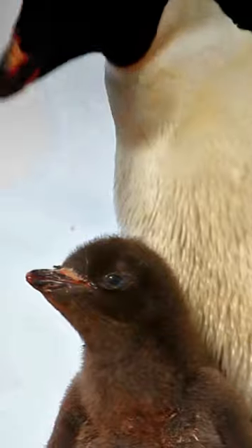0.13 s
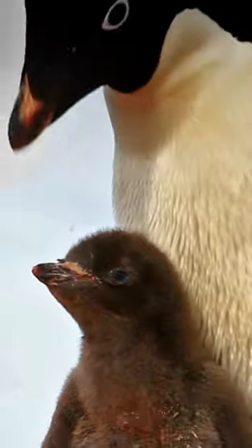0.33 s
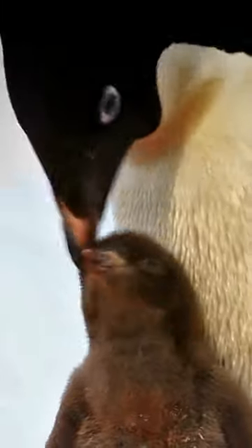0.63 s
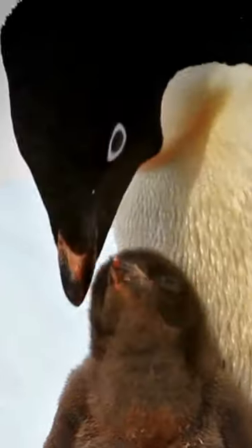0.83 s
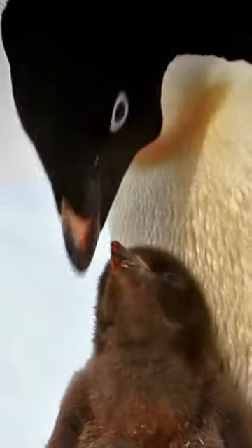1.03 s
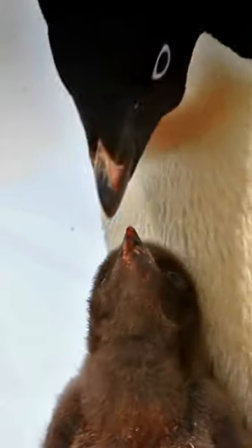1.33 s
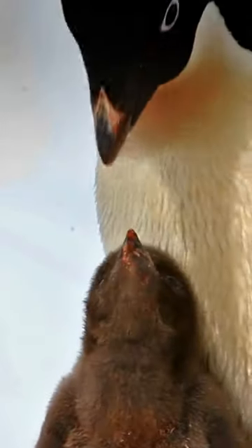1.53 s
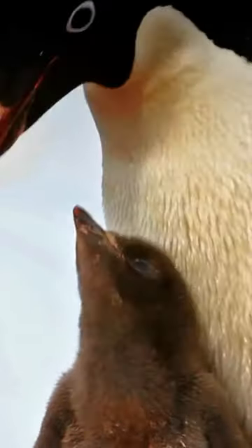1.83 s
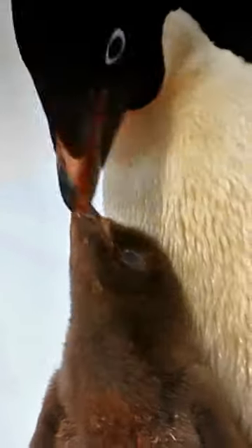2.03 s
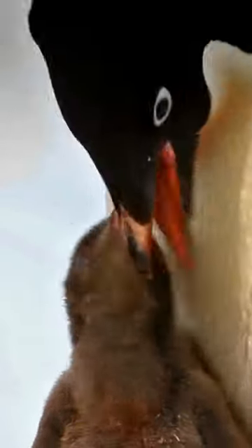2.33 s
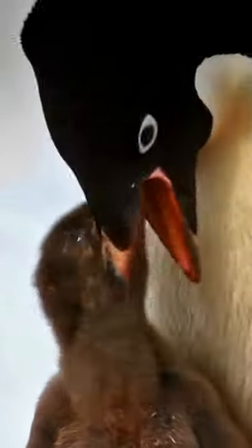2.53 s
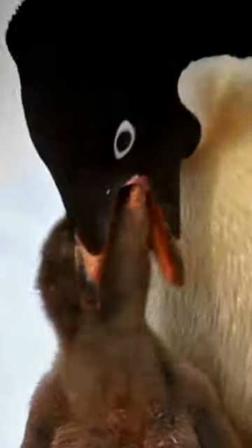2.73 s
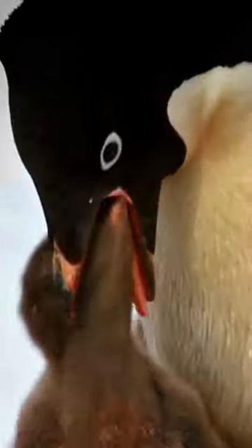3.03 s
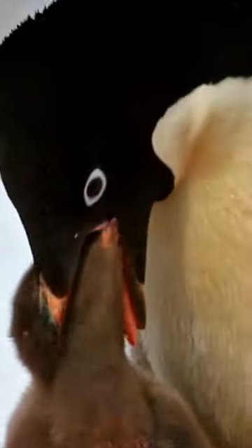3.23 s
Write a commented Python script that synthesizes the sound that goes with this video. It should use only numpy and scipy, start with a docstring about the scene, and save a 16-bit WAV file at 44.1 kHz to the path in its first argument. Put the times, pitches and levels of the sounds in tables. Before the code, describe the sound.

Penguins bray close by in strings of harsh barks and hoarse rasps over a breezy colony murmur

```python
"""Penguin colony on a breezy shore

Two near birds give strings of short barks and long rasps: rough pulses ring through throat resonances.
Far birds answer with thin falling notes, one bird croaks, a hoarse chorus swells, a chick whistles and
squawks, beaks click. Echoes, wind, murmur and hiss are shaped noise. The microphone opens after a moment
of silence, with a negative offset that mostly shrinks, stronger on the right channel."""
import sys
import numpy as np
from scipy import signal
from scipy.io import wavfile
from scipy.ndimage import uniform_filter1d

SR = 44100
rng = np.random.default_rng(int(sys.argv[2]) if len(sys.argv) > 2 else 0)


def generate_wav(signal):
    """Clip the signal to [-1, 1] and save it as 16-bit WAV at the path in sys.argv[1]."""
    frames = np.transpose(np.atleast_2d(signal))
    scaled = np.clip(frames, -1, 1) * 32767
    pcm = np.round(scaled).astype(np.int16)
    wavfile.write(sys.argv[1], SR, pcm)


N = 149499  # length of the scene in samples

# Throat of the far birds. Each row: resonance in Hz, width in Hz, level in dB.
FAR_RESONANCES = [(970, 220, 0), (1420, 340, -2)]

# Pulse rate and noise share (0 to 1) of the rasp, relative unevenness of pulse spacing,
# rms unevenness of pulse size and of level in dB
RASP_HZ, RASP_ROUGH, JITTER, SHIMMER_DB, THROB_DB = 388, .2, .55, 2.6, 1.
RATTLE_HZ, RATTLE_DB, STRONG_WEAK_DB = 68, 2.3, 3
BREATH = .35  # amount of extra breath in the high voice
SECOND_BIRD_S = 1.3  # calls that start later come from the second near bird
# Barks: times of the two parts, then their noise shares (0 to 1) and jitters
HEAD_S, TAIL_DELAY_S, BEAT_DELAY_S, RISE_S, FALL_S = .033, .024, .033, .012, .028
HEAD_ROUGH, TAIL_ROUGH, HEAD_JITTER, TAIL_JITTER = .17, .24, .13, .28
HEAD_ARCH, TAIL_LIFT, TAIL_SAG = .041, 1.35, .42  # pitch bends as shares of the bark's pitch
# Far birds: exponent of the pitch fall, noise share (0 to 1), relative unevenness of pulse spacing,
# rms unevenness of pulse size in dB
FAR_SAG, FAR_ROUGH, FAR_JITTER, FAR_SHIMMER_DB = 1.3, .08, .04, 1.
CLICK_WIDTH_HZ = 440
ECHO_DB, HISS_DB, SIDE_DB = -13, -65.5, -63
MURMUR_PATCH_DB, MURMUR_FLICKER_DB = 1.6, .8
# Microphone: left offset as a share of the right, opening time, upper band limit
LEFT_SHARE, OPEN_S, EDGE_HZ = .188, .0816, 15500


def gain_of(db):
    """Amplitude factor of a level in dB."""
    return 10 ** (np.asarray(db) / 20)


def evened(x):
    """The signal scaled to an rms of 1."""
    return x / np.sqrt(np.mean(x ** 2) + 1e-20)


def curve(rows, t, column=1):
    """Straight lines through one column of a table whose first column is time."""
    columns = np.transpose(rows)
    return np.interp(t, columns[0], columns[column])


def add(mix, s, sound):
    """Lays a sound into the mix from s seconds on."""
    part = mix[round(s * SR):][:len(sound)]
    part += sound[:len(part)]


def wander(length, hz):
    """Smooth random motion of rms 1, changing about hz times a second."""
    lowpass = signal.butter(2, hz, fs=SR, output="sos")
    motion = signal.sosfilt(lowpass, rng.standard_normal(length + 4000))
    return evened(motion[4000:])  # without the filter's start-up


def pulses(hz, jitter, shimmer_db, rough, strong_weak_db=0):
    """Pulses of the syrinx, uneven in spacing and size, mixed with puffs of breath noise."""
    n = len(hz)
    turns = np.cumsum(hz * np.exp(.3 * jitter * wander(n, 150))) / SR
    shimmer = shimmer_db * np.sqrt(3) * rng.uniform(-1, 1, n)
    alternation = strong_weak_db * (-1) ** np.floor(turns)
    ticks = np.diff(np.floor(turns), prepend=0) * gain_of(shimmer + alternation)
    # Breath bursts at each pulse and dies down until the next
    puffs = (.15 + np.exp(-(turns % 1) / .25)) * rng.standard_normal(n)
    rough = np.clip(rough, 0, 1)
    return (1 - rough) * evened(ticks - ticks.mean()) + rough * evened(puffs)


def resonate(x, hz, width_hz):
    """A steep resonance of gain 1: one two-pole peak applied twice."""
    # Two passes narrow the peak, so each is made 1.55 times as wide
    b, a = signal.iirpeak(hz, hz / width_hz / 1.55, fs=SR)
    return signal.lfilter(b, a, signal.lfilter(b, a, x))


def throat(drive, table):
    """Resonances of the airway side by side, alternating in sign."""
    voice = 0
    for k, (hz, width_hz, db) in enumerate(table):
        voice = voice + (-1) ** k * gain_of(db) * resonate(drive, hz, width_hz)
    return voice


def voiced(drive, start, treble_db, ring_db, edge_db):
    """Low and high parts of a near voice; the high part carries extra breath."""
    # Low throat, one table per near bird. Each row: resonance in Hz, width in Hz, level in dB.
    chest = [
        [(370, 170, -2), (570, 180, 2)],
        [(352, 190, -1), (510, 190, -.5), (650, 150, -4)],
    ]
    # Resonances that an open beak lifts. Each row: resonance in Hz, width in Hz, level in dB.
    beak = [(1190, 340, -10), (1670, 250, -12)]
    # Upper resonances. Each row: resonance in Hz, width in Hz, level in dB.
    upper = [(2500, 300, -23), (3010, 190, -18.5), (3520, 230, -26)]
    # Top edge of the voice. Each row: resonance in Hz, width in Hz, level in dB.
    top = [(4650, 390, -27)]
    low = throat(drive, chest[int(start > SECOND_BIRD_S)])
    flutter = 1 + BREATH * np.tanh(wander(len(drive), 3050))
    airy = drive * flutter + BREATH * rng.standard_normal(len(drive))
    high = gain_of(treble_db) * throat(airy, beak)
    high = high + gain_of(ring_db) * throat(airy, upper)
    high = high + gain_of(edge_db) * throat(airy, top)
    return -np.array([low, high]) / np.std(low)


def bark(start, length, head_db, tail_db, hz, treble_db, edge_db):
    """A clear knock of voice, then a rough tail that sags in pitch; its treble enters late, as a second beat."""
    t = np.arange(0, length + 0.027, 1 / SR)
    u = np.clip(t / HEAD_S, 0, 1)
    arch = 1 - HEAD_ARCH * (2 * u - 1) ** 2
    drive = pulses(hz * arch, HEAD_JITTER, SHIMMER_DB, HEAD_ROUGH)
    head = voiced(drive, start, treble_db, treble_db - 3, edge_db).sum(0) * np.sin(np.pi * u)

    sag = TAIL_LIFT - TAIL_SAG * np.sqrt(t / length)
    drive = pulses(hz * sag, TAIL_JITTER, SHIMMER_DB, TAIL_ROUGH)
    delays = np.array([[TAIL_DELAY_S], [BEAT_DELAY_S]])  # low part, high part
    entry = np.clip((t - delays) / RISE_S, 0, 1)
    tail = (voiced(drive, start, treble_db + 3, treble_db, edge_db + 2) * entry).sum(0)
    throb = gain_of(THROB_DB * wander(len(t), 45) - 4 * t / length)
    fade = np.clip((length - t) / FALL_S, 0, 1) * throb
    return start, gain_of(head_db) * head + gain_of(tail_db) * fade * tail


def rasp(rows, treble_db):
    """A long hoarse note of strong and weak pulses in turn; its treble rattles."""
    t = np.arange(rows[0][0], rows[-1][0], 1 / SR)
    drive = pulses(RASP_HZ * np.ones(len(t)), JITTER, SHIMMER_DB, RASP_ROUGH, STRONG_WEAK_DB)
    ring_db, edge_db = curve(rows, t, column=2), curve(rows, t, column=3)
    low, high = voiced(drive, t[0], treble_db, ring_db, edge_db)
    rattle_hz = RATTLE_HZ * (1 + .2 * wander(len(t), 30))
    rattle = np.cos(2 * np.pi * np.cumsum(rattle_hz) / SR)
    level = gain_of(curve(rows, t) + THROB_DB * wander(len(t), 45))
    return t[0], (low + high * gain_of(RATTLE_DB * rattle)) * level


def near_birds():
    """Two birds close to the microphone: pulsed syrinx voices in short barks and long rasps."""
    # Each row: start in seconds, length in seconds, head in dB, tail in dB, pitch in Hz,
    # treble in dB, edge in dB.
    barks = [(0.099, 0.084, -38, -43, 355, -5, -15), (0.208, .08, -38.5, -43, 350, -4, -8),
             (0.322, 0.097, -40.5, -45, 345, -4, -14), (0.433, 0.1, -44.5, -46, 340, -3, -14),
             (1.731, 0.093, -34, -39, 315, -4.5, -12), (1.861, 0.093, -34, -37, 350, -4, -10),
             (1.991, .095, -33, -36.5, 358, -2.5, -5.5), (2.114, 0.092, -34, -37, 355, -1, -2),
             (2.236, 0.079, -36.5, -36.5, 346, 0.5, -3), (2.345, 0.097, -35.5, -41, 345, -0.5, 1.5),
             (2.457, 0.093, -38, -40.5, 340, 1, 2.5)]
    # One table per rasp. Each row: time in seconds, level in dB, ring in dB, edge in dB.
    rasps = [
        [(.525, -41.5, -12, -20), (.55, -47, -12, -22), (.8, -49, -31, -26), (1.12, -51.5, -16, -14),
         (1.17, -75, -12, -12)],
        [(2.55, -38, -8, -3), (2.575, -42, 0, 4.5), (2.7, -44, 1, 1), (2.8, -44, 4, -5), (2.96, -48, 4.5, -1),
         (3.01, -57.5, 8, -4)],
    ]
    # Treble of each rasp in dB.
    rasp_treble_db = [-9, 4.5]
    out = np.zeros(N)
    for row in barks:
        add(out, *bark(*row))
    for rows, treble_db in zip(rasps, rasp_treble_db):
        add(out, *rasp(rows, treble_db))
    return out


def tone(rows):
    """A sine that follows pitch and level, its level wavering a little."""
    t = np.arange(rows[0][0], rows[-1][0], 1 / SR)
    level = gain_of(curve(rows, t, column=2) + 1.5 * wander(len(t), 60))
    return t[0], np.sqrt(2) * level * np.sin(2 * np.pi * np.cumsum(curve(rows, t)) / SR)


def croak():
    """Uneven strong and weak pulses through a half-shut throat; every second pulse sounds as a hum."""
    # Each row: time in seconds, hum in Hz, hum level in dB, croak level in dB.
    course = [(1.55, 151.7, -40, -63), (1.58, 157, -49, -43), (1.62, 198, -43, -39),
              (1.66, 174.2, -42, -46), (1.685, 170, -70, -48)]
    # Half-shut throat. Each row: resonance in Hz, width in Hz, level in dB.
    half_shut = [(340, 140, -3), (570, 210, 3), (1240, 260, -9), (1880, 350, -13), (2600, 550, -21)]
    t = np.arange(course[0][0], course[-1][0], 1 / SR)
    drive = pulses(2 * curve(course, t), JITTER, SHIMMER_DB, RASP_ROUGH, STRONG_WEAK_DB)
    grate = -gain_of(curve(course, t, column=3)) * evened(throat(drive, half_shut))
    start, hum = tone(course)
    return start, hum + grate


def squawk():
    """The falling end of a chick's bright call: pulses through a small, high throat."""
    # Each row: time in seconds, pitch in Hz, level in dB.
    course = [(.07, 446, -48.5), (.1, 427, -48), (.145, 348, -55), (.155, 314, -74)]
    # The chick's throat. Each row: resonance in Hz, width in Hz, level in dB.
    small_throat = [(2280, 500, -4.5), (3010, 380, -1), (3760, 930, -15), (5370, 500, -20)]
    t = np.arange(course[0][0], course[-1][0], 1 / SR)
    drive = pulses(curve(course, t), FAR_JITTER, FAR_SHIMMER_DB, HEAD_ROUGH)
    return t[0], gain_of(curve(course, t, column=2)) * evened(throat(drive, small_throat))


def whistle():
    """A chick's whistle, a nearly pure gliding tone."""
    # Each row: time in seconds, pitch in Hz, level in dB.
    glide = [(1.095, 3150, -74), (1.11, 3180, -62), (1.148, 3200, -60), (1.168, 3600, -60),
             (1.182, 3720, -74), (1.205, 3350, -66), (1.245, 2920, -73)]
    return tone(glide)


def beak_clicks():
    """Beaks snap: short decaying noise rings at one pitch."""
    # Each row: time in seconds, peak in dB, ring in Hz.
    snaps = [(1.445, -39, 3180), (1.46, -47, 2430), (1.704, -46, 3300), (3.093, -45.5, 1500),
             (3.189, -42, 1210), (3.344, -32, 1160), (3.375, -36, 800)]
    out, t = np.zeros(N), np.arange(500) / SR
    for s, db, hz in snaps:
        burst = rng.standard_normal(500) * np.exp(-t / 0.0064)
        snap = resonate(burst, hz, CLICK_WIDTH_HZ)
        add(out, s, gain_of(db) * snap / abs(snap).max())
    return out


def far_note(start, length, db, first_hz, last_hz):
    """A thin falling note: only the overtones near the far throat's peaks carry."""
    u = np.arange(0, length, 1 / SR) / length
    hz = first_hz + (last_hz - first_hz) * u ** FAR_SAG
    drive = pulses(hz, FAR_JITTER, FAR_SHIMMER_DB, FAR_ROUGH)
    return start, gain_of(db) * np.sqrt(np.sin(np.pi * u)) * evened(throat(drive, FAR_RESONANCES))


def far_birds():
    """Birds at a distance, answering in thin notes of light, regular pulses."""
    # Each row: start in seconds, length in seconds, level in dB, first pitch in Hz, last pitch in Hz.
    notes = [(.708, .065, -54, 380, 310), (.815, .062, -53.5, 370, 312), (.912, .066, -54, 350, 306),
             (1.015, .06, -54.5, 340, 308), (1.9, .075, -52, 410, 350), (2.195, .045, -55, 395, 350),
             (2.992, .075, -49, 340, 312), (3.1, .062, -50, 362, 315), (3.205, .058, -52, 385, 340),
             (3.302, .066, -51, 400, 345)]
    out = np.zeros(N)
    for row in notes:
        add(out, *far_note(*row))
    return out


def chorus():
    """A hoarse chorus further off: one very breathy pulsed voice, of which the middle resonances carry."""
    # Each row: time in seconds, level in dB.
    swell = [(1.4, -62.5), (3., -53.5), (3.39, -54.5)]
    t = np.arange(swell[0][0], swell[-1][0], 1 / SR)
    drive = pulses(RASP_HZ * np.ones(len(t)), JITTER, SHIMMER_DB, 0.43)
    level = gain_of(curve(swell, t) + 2 * THROB_DB * wander(len(t), 33))
    return t[0], level * evened(throat(drive, FAR_RESONANCES))


def shore(x):
    """A short scatter of echoes from the stony ground: sparse random taps that die away."""
    t = np.arange(6000) / SR
    sparse = rng.standard_normal(6000) * (rng.random(6000) < .05)
    taps = sparse * gain_of(-60 * t / 0.21) * (t > .004)  # dies away at 60 dB per 0.21 s
    return signal.oaconvolve(x, taps / np.linalg.norm(taps))[:N]


def shaped(points, patchy_db, flicker_db):
    """Noise of a given spectrum with drifting patches and a flicker common to all pitches."""
    frames, hz = N // 256 + 5, np.fft.rfftfreq(1024, 1 / SR)
    a, b, patches = rng.standard_normal((frames, 513, 3)).T
    patches = evened(uniform_filter1d(uniform_filter1d(patches, 10, 0), 10, 1))
    flicker = evened(uniform_filter1d(rng.standard_normal(frames), 8))
    f, db = np.transpose(points)
    spectrum_db = np.interp(np.log(hz + 1), np.log(f + 1), db, left=-90, right=-90)
    level = gain_of(spectrum_db[:, None] + patchy_db * patches + flicker_db * flicker)
    return evened(signal.istft((a + 1j * b) * level, nperseg=1024, noverlap=768)[1][:N])


def wind(t):
    """Breeze at the microphone: low rumbling noise."""
    # Spectrum. Each row: frequency in Hz, relative level in dB.
    spectrum = [(13, -28), (22, 2), (32, -16.5), (70, -17), (110, -21), (203, -22), (280, -33.5),
                (620, -60)]
    # Each row: time in seconds, level in dB.
    level_db = [(.1, -42.5), (1.29, -45.5), (2.5, -44), (3.39, -46)]
    return gain_of(curve(level_db, t)) * shaped(spectrum, patchy_db=-1.0, flicker_db=0.5)


def murmur(t):
    """Background murmur: noise strongest around the voices' low pitches."""
    # Spectrum. Each row: frequency in Hz, relative level in dB.
    spectrum = [(140, -52), (230, -2), (500, 11.5), (800, -5), (1400, -3), (2200, -10.5), (3430, -13),
                (6000, -46.5)]
    # Each row: time in seconds, level in dB.
    level_db = [(.1, -49.5), (1.3, -53), (3.39, -53.5)]
    noise = shaped(spectrum, patchy_db=MURMUR_PATCH_DB, flicker_db=MURMUR_FLICKER_DB)
    return gain_of(curve(level_db, t)) * noise


def hiss():
    """Faint hiss, flat up to 20 kHz before the microphone's band limit."""
    return gain_of(HISS_DB) * shaped([(1, 0), (20000, 0)], patchy_db=2.5, flicker_db=0.85)


def side_noise():
    """Faint noise that enters left and right with opposite signs."""
    # Spectrum. Each row: frequency in Hz, relative level in dB per Hz.
    spectrum = [(30, 3.5), (150, 3), (400, -10.5), (900, -24), (3000, -16), (5500, -19.5), (7000, -26),
                (17000, -37.5)]
    return gain_of(SIDE_DB) * shaped(spectrum, patchy_db=0.5, flicker_db=2.7)


def scene():
    """The colony and its echoes in the middle, with noise that differs left and right."""
    t = np.arange(N) / SR
    birds = near_birds() + far_birds() + beak_clicks()
    for call in (croak, squawk, whistle, chorus):
        add(birds, *call())
    mid = birds + gain_of(ECHO_DB) * shore(birds) + wind(t) + murmur(t) + hiss()
    side = side_noise()
    return np.array([mid + side, mid - side])


def record(dry):
    """The microphone: adds the offset, opens the gate, limits the band."""
    # Each row: time in seconds, offset of the right channel (full scale 1).
    offset = [(.08, -.183), (1.6, -.18), (2., -.165), (2.45, -.147), (2.95, -.123), (3.39, -.125)]
    t = np.arange(N) / SR
    shift = curve(offset, t) * np.array([[LEFT_SHARE], [1]])
    wet = (dry + shift) * (t > OPEN_S)
    wet = np.pad(wet, ((0, 0), (0, 400)), "edge")  # keeps the offset from dropping at the end
    lowpass = signal.firwin(511, EDGE_HZ, window=("kaiser", 9), fs=SR)
    return signal.oaconvolve(wet, lowpass[None], "same")[:, :N]


dry = scene()
out = record(dry)
generate_wav(out)
```